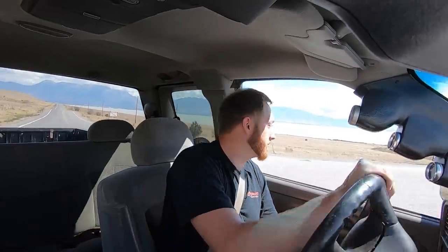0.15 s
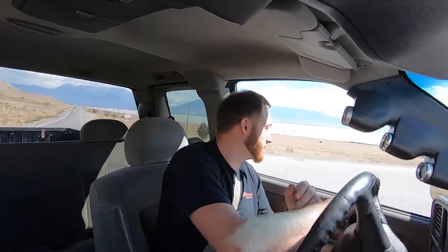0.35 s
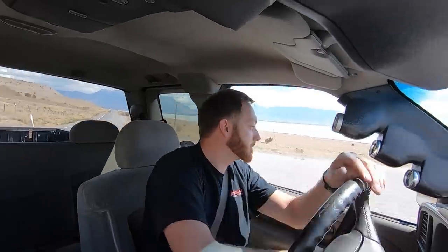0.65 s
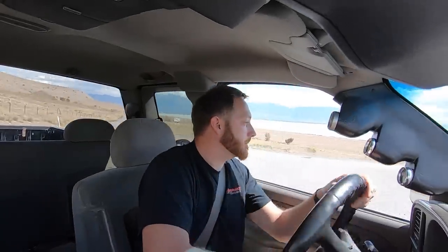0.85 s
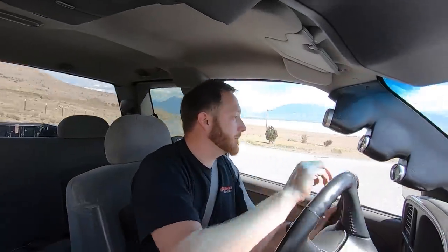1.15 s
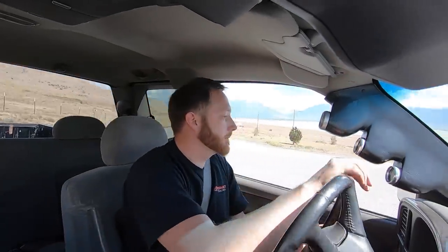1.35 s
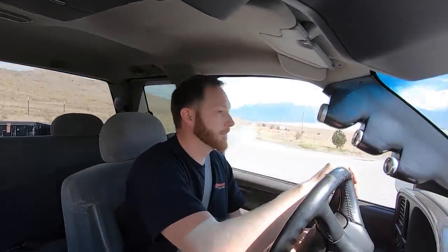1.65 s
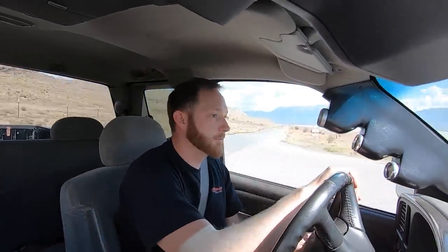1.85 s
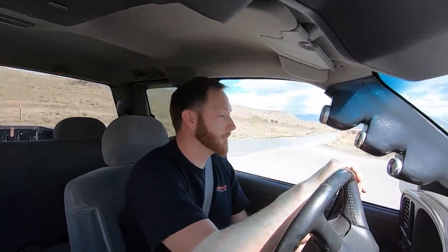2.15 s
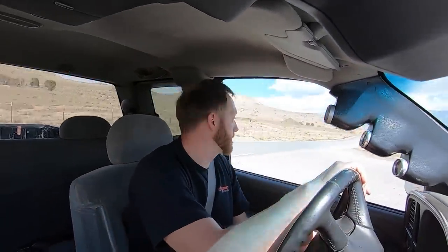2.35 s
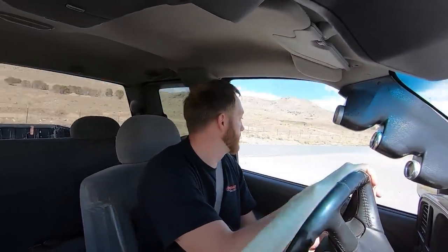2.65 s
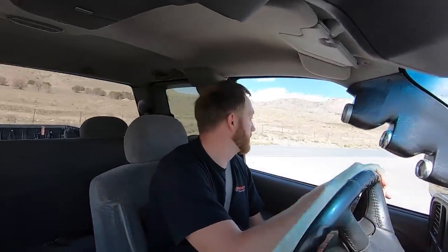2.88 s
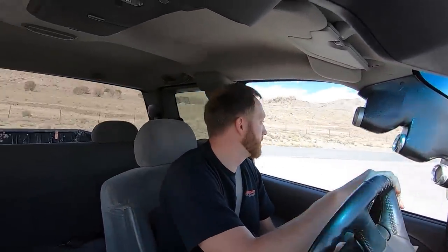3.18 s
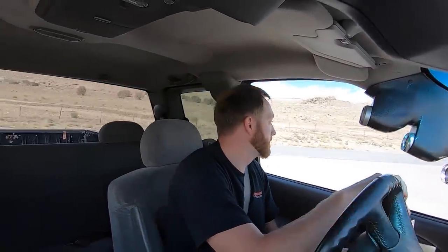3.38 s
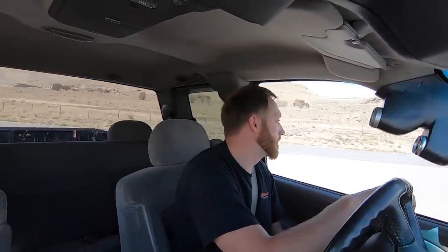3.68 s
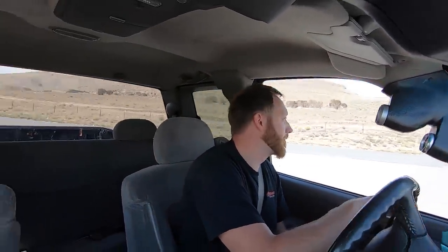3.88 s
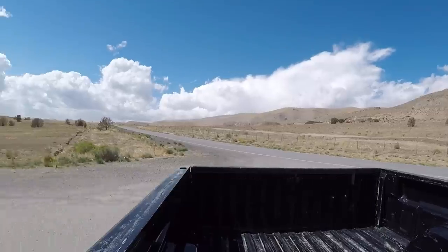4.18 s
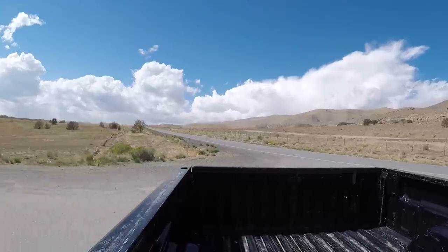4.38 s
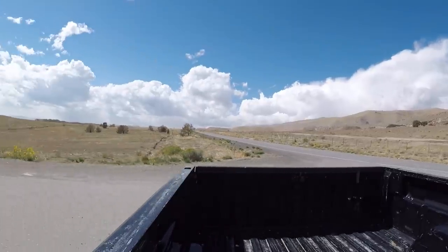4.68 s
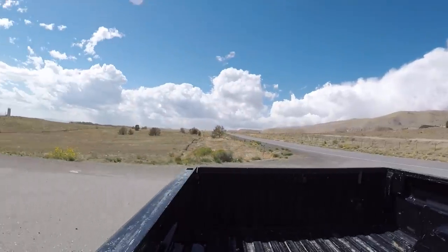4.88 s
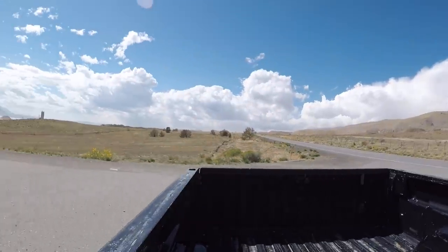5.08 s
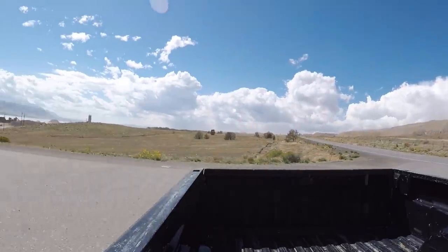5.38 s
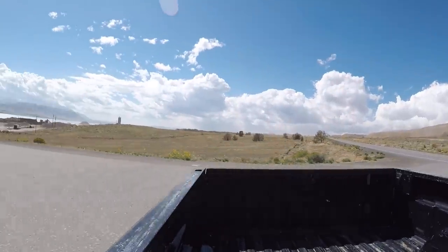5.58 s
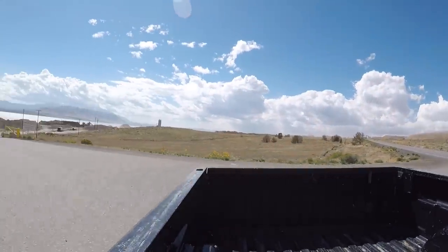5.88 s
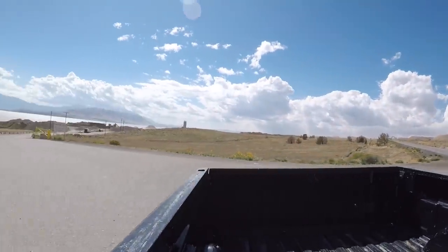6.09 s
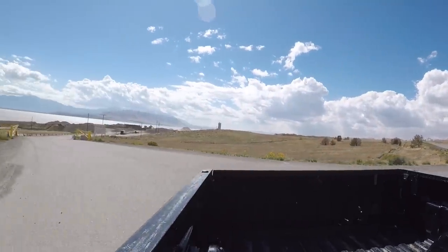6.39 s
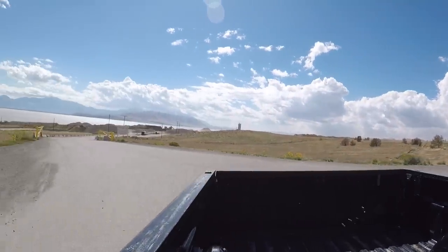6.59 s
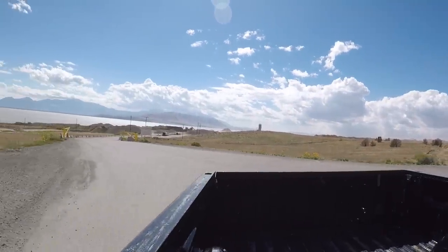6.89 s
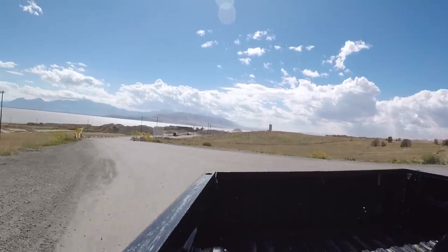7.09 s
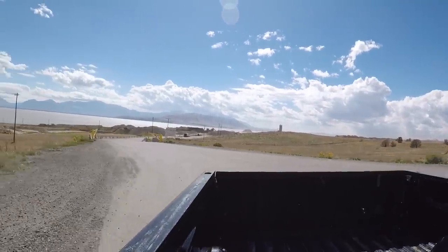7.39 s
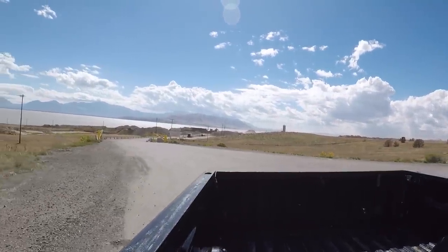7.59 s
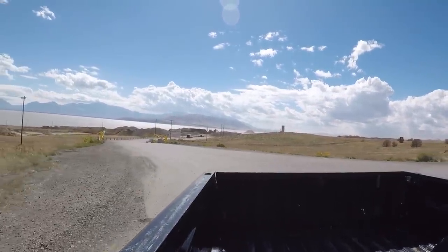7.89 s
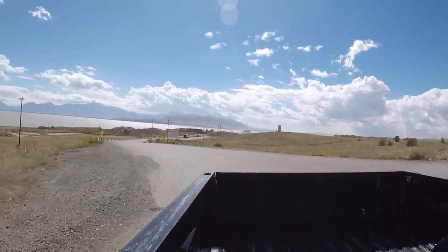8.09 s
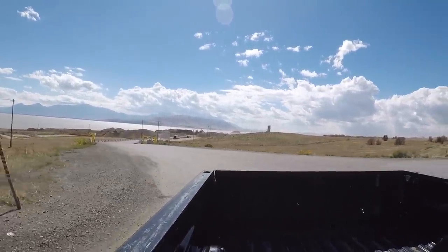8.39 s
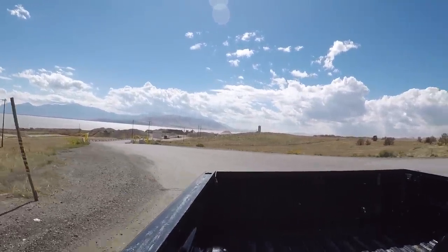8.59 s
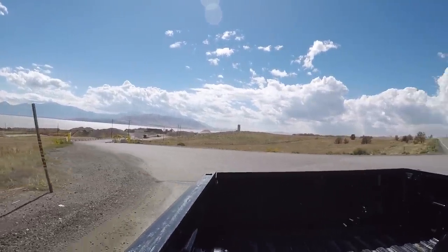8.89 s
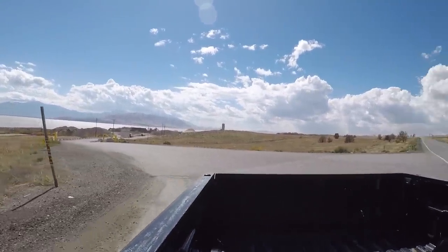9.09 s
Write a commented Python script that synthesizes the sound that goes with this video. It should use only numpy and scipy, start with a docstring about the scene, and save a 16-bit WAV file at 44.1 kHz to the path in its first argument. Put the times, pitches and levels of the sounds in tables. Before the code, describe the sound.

Inside a closed pickup cab, a low, muffled engine boom near idle and dull road rumble, with soft hand pats on the wheel and tiny trim ticks. Around 3.5 to 4 seconds it fades to a microphone in the open bed: much louder loping exhaust burble, engine clatter, tyre grit, wind and metallic bed rattles. A heavy thump and gust hit at six seconds, then the throttle opens and the engine climbs with a droning pipe.

```python
"""First we sit in the closed cab of a turbocharged V8 pickup that rolls through a turn near idle:
tones at multiples of the engine speed make a boom, filtered noise makes road and hands, trim ticks ring.
From about 3.5 s this fades over to the open load bed: noisy puffs ring the tailpipe in a loping burble,
the engine clatters, grit flicks, wind buffets, and bursts of noise shake the rattling bed; at 6 s it
thumps in a gust. At 7.5 s the throttle opens, the pipe drones and engine speed more than doubles."""
import sys
import numpy as np
from scipy import signal
from scipy.fft import rfft, irfft, next_fast_len
from scipy.io import wavfile
from scipy.ndimage import uniform_filter1d, minimum_filter1d

SR = 44100
rng = np.random.default_rng(int(sys.argv[2]) if len(sys.argv) > 2 else 0)


def to_wav(sig):
    """Store sig (one row per channel, or 1-D mono) as 16-bit WAV at the path in sys.argv[1].

    Samples outside -1..1 are clipped; the rate is SR.
    """
    pcm = np.clip(np.atleast_2d(sig), -1, 1) * 32767
    pcm = np.round(pcm).astype(np.int16)
    wavfile.write(sys.argv[1], SR, pcm.T)  # frames by channels


N = 407925
TIME = np.arange(N) / SR

# Noise colours, from low to high pitch; overall loudness is set elsewhere:
# (frequency [Hz], relative level [dB per Hz])
BUFFET_COLOUR = [(15, -18.5), (30, -3), (45, -0.5), (70, -5.5), (120, -8.5), (200, -11.5), (400, -54.5)]
GUST_COLOUR = [(25, 12), (70, 1.5), (300, -3), (600, -15.5), (1000, -34), (2000, -50)]
ROAD_COLOUR = [(25, 4), (60, 1), (125, -7), (170, -6), (280, -11.5), (370, -21), (550, -29.5), (1000, -35),
               (2000, -45.5), (4000, -52.5), (15000, -64)]
SWAY_COLOUR = [(12, 17), (23, 5), (33, 13.5), (52, -9), (200, -54)]
HISS_COLOUR = [(1500, 5), (3200, 5), (4500, 0.5), (6200, -3), (7300, -11.5), (8800, -7), (12000, -19.5),
               (15000, -29.5)]
GRIT_COLOUR = [(1500, -31), (3500, 10), (6000, 5), (7300, -3.5), (9000, -3), (11000, -6.5), (13500, -6.5),
               (15500, -30)]
HAND_COLOUR = [(200, 9), (500, 10.5), (1400, 4.5), (4000, -8.5), (8500, -3), (12000, -10), (15500, -26)]
CLATTER_COLOUR = [(150, -34), (300, 12), (600, 9), (900, 9), (1500, -4.5), (2200, -3.5), (3300, -28),
                  (7000, -75)]

# Loudness of the wind buffeting: (time [s], level [dB])
BUFFET_LEVEL = [(3.65, -36), (4.1, -25.5), (5.5, -23.5), (5.8, -22), (6.3, -25), (7.7, -24), (9.25, -26.5)]
# Gusts over the bed: (start [s], attack [s], hold [s], release [s], level before lumpiness [dB])
GUSTS = [(5.99, 0.032, 0.28, 0.5, -25)]
# Loudness of the tyre hiss, before the tread setting: (time [s], level [dB])
HISS_LEVEL = [(4.0, -48.5), (4.23, -49), (6.78, -55), (7.52, -50), (7.87, -47.5), (8.39, -53.5),
              (9.25, -52)]
# Grit flicked by the tyres, before the stone setting: (time [s], level [dB])
GRIT = [(3.7744, -42.5), (4.6155, -43.5), (4.8274, -43), (5.067, -43.5), (5.3911, -46.5), (5.684, -42),
        (5.8207, -45.5), (6.2906, -43), (6.8349, -49.5), (7.4305, -48), (8.1206, -44.5)]
# Ticks of the cab trim: (time [s], level [dB], ring [Hz])
TICKS = [(1.328, -62, 2000), (1.417, -55.5, 2500), (1.55, -59, 2200), (1.697, -62, 4300),
         (2.084, -61, 3080), (2.315, -59, 4860), (2.975, -58.5, 2290)]
# Hands on the wheel: (time [s], level [dB], time to die away by 60 dB [s], treble edge [Hz])
HAND_TOUCHES = [(.10, -57, 0.22, 5000), (.346, -49.5, 0.084, 9000), (0.4, -47, 0.039, 4000),
                (0.475, -40.5, 0.08, 14000), (0.505, -45, 0.084, 8000), (.77, -60, 0.21, 4000),
                (0.825, -44.5, 0.14, 5130), (.848, -57, .07, 4000), (.925, -62, 0.16, 5000),
                (1.425, -49, 0.17, 3000), (1.497, -47.5, 0.19, 4000)]
# The wheel slides through the hands: (start [s], attack [s], hold [s], release [s])
WHEEL_SLIDE = (0, .02, 0.7, 0.51)
# The bed thumps as the truck jolts over rough ground:
# (time [s], level [dB], time to die away by 60 dB [s])
THUMPS = [(6.074, -15, 0.066), (6.124, -10.5, 0.085), (6.196, -16, 0.27), (6.312, -20, 0.18),
          (6.411, -20, .1), (6.472, -19.5, 0.11)]
# Knocks in the bed, before the low and high settings:
# (time [s], level [dB], time to die away by 60 dB [s], extra level of the high ring [dB])
KNOCKS = [(3.591, -21, 0.14, -4.5), (4.078, -32, 0.063, 11.5), (4.236, -21.5, 0.23, 1.5),
          (4.339, -20.5, 0.15, -4), (4.519, -25, 0.055, -6), (4.552, -33, .12, 9), (4.71, -23, 0.062, -4),
          (4.781, -20.5, 0.23, -9), (5.068, -38.5, 0.23, 7.5), (6.126, -15, 0.093, -39),
          (6.135, -12, 0.029, -12.5), (6.197, -23, 0.28, -14), (6.245, -12, 0.048, -6.5),
          (6.754, -30.5, 0.56, -3), (6.978, -19, 0.09, -11), (7.225, -31, 0.13, 6.5),
          (8.026, -22, 0.08, -6), (8.063, -33, 0.065, 10), (8.935, -28.5, 0.31, 4), (9.044, -26.5, 0.4, -4),
          (9.107, -19, 0.23, -9), (9.185, -14.5, 0.25, -12)]

# Resonances, with levels relative to each other: (frequency [Hz], width [Hz], level [dB])
BED_THUD_MODES = [(128, 84, 3), (235, 56, 7.5), (377, 107, 2.5)]
STEEL_PANEL_MODES = [(527, 39, 2.5), (638, 65, 1), (862, 78, -1.5), (1115, 73, -5.5), (1207, 32, -2.5),
                     (1440, 100, -7), (1777, 73, -5), (1960, 240, -11.5), (2284, 250, -10),
                     (3160, 2000, -22), (5560, 2600, -21)]
TURBO_INLET_MODES = [(1454, 240, 8.5), (3250, 690, -2), (5850, 1500, -6.5)]
LOPE_MODES = [(252, 49, -1), (362, 52, 0)]
DRONE_MODE = [(246, 9.6, 0)]
TAILPIPE_MODES = [(177, 22.7, 0), (246, 27, 0), (269.3, 13.7, 1.5), (337, 18, -8.5), (378.6, 28, -5),
                  (537, 36, -7), (654, 30, -13), (829, 21, -16), (1277, 200, -25.5)]

# Presses on the pedal bring up the exhaust puffs:
# (start [s], attack [s], hold [s], release [s], lift [dB])
PEDAL_PRESSES = [(3.903, 0.57, 1.6, 0.59, 5.5), (6.753, 0.75, 0.85, 0.69, 5.5)]
# The eight cylinders in firing order: (strength [dB], delay along its own path [s])
CYLINDERS = [(2, 0.00021), (-0.5, 0.0014), (3, 0.00194), (2, .0019), (0, .0036), (0.5, 0.00082),
             (-4.5, 0.00303), (2, 0.0015)]
# Engine speed before its slight wavering: (time [s], four-stroke cycles per second [1/s])
ENGINE_SPEED = [(0.0, 6.86), (0.9, 7.53), (1.25, 6.83), (1.9, 7.33), (2.5, 7.08), (3.0, 7.2), (4.05, 6.8),
                (4.5, 7.14), (5.0, 6.99), (5.6, 7.24), (6.1, 6.95), (6.5, 7.2), (7.15, 7.76), (7.42, 7.79),
                (7.7, 10.9), (7.95, 12.85), (8.12, 13.55), (8.5, 13.65), (8.7, 14.35), (8.93, 15.8),
                (9.25, 16.05)]
# Engine tones, with relative levels: (multiple of the cycle rate [-], in the cab [dB],
# at the bed idling [dB], at the bed under load [dB])
ENGINE_ORDERS = [(5, -8, -6, 0), (7, -16, -9, -13), (8, -3, 1, -13), (9, -11, -13, -20),
                 (10, -18, -21, -18), (11, 1, -3, -18), (12, -13, -14, -19), (13, 1, 0, -16),
                 (15, -12, -8, -23), (16, 0, -7, -24), (17, -3, -9, -20), (18, -5, -15, -20),
                 (19, -4, -18, -28), (20, -18, -21, -18), (21, -8, -12, -21), (28, -26, -21, -27),
                 (40, -30, -26, -32)]
# Resonances and dips that lift or sink a passing tone: (frequency [Hz], half-width [Hz], lift [dB])
CAB_AIR_MODES = [(120, 4, 7)]
BOOM_PIPE_MODES = [(88.5, 4.5, 10), (101, 6, -8), (123, 6, 8), (138, 4, -9), (156, 7, 5), (207, 12, -6),
                   (268, 12, 6), (315, 25, -8), (540, 16, 13), (630, 30, -10)]

BUFFET_SWING_DB = 2
CAB_ROAD_DB, CAB_SWAY_DB, CAB_BOOM_DB = -35, -31, -29.5
TICK_DECAY_S, TICK_WIDTH_HZ = 0.088, 570
CLATTER_DB, CLATTER_FOLLOWS = -32, 0.63  # the second is a share of the swing of the tyre hiss
# Place of the chug in the cycle (0-1), level, unevenness, and cycles per second at which it is gone
LOPE_AT, LOPE_DB, LOPE_UNEVEN_DB, LOPE_GONE_AT = .54, -36.5, 1.5, 8.5
# Pipe drone: start, attack, hold and release in seconds, and its level
DRONE_SWELL, DRONE_DB = (7.39, 0.16, 0.36, 0.17), -23.5
# Hotter gas raises the drone by this share of its pitch
HEAT_AT_S, HEAT_S, HEAT_RISE = 7.68, .4, 0.101
# Exhaust puffs: level at idle, and what full strain adds
BARK_DB, BARK_STRAIN_DB = -33, 4.5
PIPE_LOW_EDGE_HZ = 179
# Exhaust boom at the bed: level at idle, then what load (as load squared) and strain add when at 1
BOOM_DB, BOOM_LOAD_DB, BOOM_STRAIN_DB = -17.6, 4.2, 1
THROTTLE_AT_S, THROTTLE_OPENS_S, FULL_LOAD = 7.52, 0.21, 0.97  # load runs 0-1
STRAIN_LAG_S = 0.1
FADE_AT_S, FADE_S = 3.456, 0.66  # from the cab to the bed
CUTOFF_HZ = 15700


def from_db(db):
    """Turn decibels into a gain."""
    return 10 ** (np.asarray(db) / 20)


def rms_one(x):
    """Scale a sound to an average (rms) strength of 1."""
    return x / np.sqrt(np.mean(x ** 2) + 1e-20)


def even(x, size=14700):
    """Hold the running rms, taken over size samples, near 1."""
    return x / np.sqrt(np.abs(uniform_filter1d(x ** 2, size=size)) + 1e-20)


def in_time(rows):
    """Draw each column of a curve at every sample."""
    s, *columns = np.transpose(rows)
    return [np.interp(TIME, s, c) for c in columns]


def drift(rate):
    """Wander by chance around 0 with a spread of 1; a higher rate (in Hz) wanders faster."""
    # made at one fortieth of the sample rate; the first 2000 values let the filter settle
    r = np.exp(-80 * np.pi * rate / SR)
    chance = rng.standard_normal(N // 40 + 2002)
    slow = signal.lfilter([1], [1, -2 * r, r * r], chance)[2000:]
    return np.interp(np.arange(N) / 40, np.arange(len(slow)), rms_one(slow))


def noise(colour):
    """Noise of rms 1 shaped by a colour table, falling away beyond its ends."""
    hz, db = np.transpose(colour)
    size = next_fast_len(N)
    f = np.maximum(np.arange(size // 2 + 1) * SR / size, 1)
    gain = from_db(np.interp(np.log(f), np.log(hz), db))
    gain *= np.minimum(f / hz[0], 1) ** 2 * np.minimum(hz[-1] / f, 1) ** 2
    return rms_one(irfft(rfft(rng.standard_normal(size)) * gain, size)[:N])


def resonate(x, modes):
    """Ring several resonances side by side, with alternating sign."""
    out = 0
    for k, (hz, width, db) in enumerate(modes):
        r = np.exp(-np.pi * width / SR)  # a narrow width rings longer
        poles = [1, -2 * r * np.cos(2 * np.pi * hz / SR), r * r]
        ring = signal.lfilter([1, 0, -1], poles, x + 1e-18)  # tiny offset avoids slow arithmetic
        out = out + (-1) ** k * from_db(db) * (1 - r * r) / 2 * ring
    return out


def muffle(x, edge_hz):
    """Take away the treble above an edge with a second-order low-pass."""
    return signal.sosfilt(signal.butter(2, edge_hz, fs=SR, output="sos"), x)


def ramp(start, length):
    """Rise from 0 to 1."""
    return np.clip((TIME - start) / length, 0, 1)


def swell(start, attack, hold, release):
    """Rise to 1, hold and fall back to 0."""
    return ramp(start, attack) - ramp(start + attack + hold, release)


def burst(at, rise, t60):
    """Swell up to a moment, then die away by 60 dB in t60 seconds."""
    out = np.zeros(N)
    near = np.abs(TIME - at) < .5
    after = TIME[near] - at
    out[near] = np.exp(np.minimum(after, 0) / rise) * from_db(-60 * np.maximum(after, 0) / t60)
    return out


def lift_db(pitch, modes):
    """How much a set of resonances and dips lifts a tone at a given pitch."""
    return sum(db / (1 + ((pitch - hz) / width) ** 2) for hz, width, db in modes)


def wind(lump_db):
    """Low buffeting on the microphone, and gusts whose level is lumpy."""
    buffet_db, = in_time(BUFFET_LEVEL)
    buffet = from_db(buffet_db + BUFFET_SWING_DB * drift(2.1)) * noise(BUFFET_COLOUR)
    gusts = sum(from_db(db) * swell(*shape) for *shape, db in GUSTS)
    return buffet + gusts * from_db(lump_db * drift(33)) * noise(GUST_COLOUR)


def road_and_sway():
    """Dull road noise that flutters in level, and the low sway of the body, as heard in the cab."""
    road = from_db(CAB_ROAD_DB + drift(23)) * noise(ROAD_COLOUR)
    return road + from_db(CAB_SWAY_DB) * noise(SWAY_COLOUR)


def tyres(hiss_db, tread_db, flutter_db, stone_db, skitter_s):
    """Uneven tread hiss, and stones spat out that skitter briefly."""
    hiss = from_db(hiss_db + tread_db + flutter_db * drift(16.0)) * noise(HISS_COLOUR)
    stones = sum(from_db(db) * burst(s + .001, .001, skitter_s) for s, db in GRIT)
    return hiss + from_db(stone_db) * stones * noise(GRIT_COLOUR)


def trim():
    """Short ticks of the cab trim, each ringing at its own pitch."""
    contact = rng.standard_normal(N)
    out = 0
    for s, db, hz in TICKS:
        ring = rms_one(resonate(contact, [(hz, TICK_WIDTH_HZ, 0)]))
        out = out + from_db(db) * burst(s, .001, TICK_DECAY_S) * ring
    return out


def hands(grain_db, slide_db):
    """Grainy rubbing: the wheel slides through the hands as it turns, with sharp pats and slower brushes."""
    rub = rms_one(noise(HAND_COLOUR) * from_db(grain_db * drift(150)))
    out = from_db(slide_db + 2 * drift(10)) * swell(*WHEEL_SLIDE) * rub
    for s, db, t60, edge_hz in HAND_TOUCHES:
        # touches that die away sooner also start more sharply
        out = out + from_db(db) * burst(s, t60 ** 3, t60) * muffle(rub, edge_hz)
    return out


def bed_thumps(edge_hz):
    """Soft, heavy blows that shake the lowest modes of the bed into a dull thud."""
    shake = even(muffle(resonate(rng.standard_normal(N), BED_THUD_MODES), edge_hz), size=882)
    return shake * sum(from_db(db) * burst(s + .003, .003, t60) for s, db, t60 in THUMPS)


def bed_rattle(grain_db, split_hz, low_db, high_db):
    """Each knock is a quick flurry of contacts on steel panels; sharp ones stir the high modes more."""
    contacts = muffle(rng.standard_normal(N) * from_db(grain_db * drift(260)), edge_hz=2960)
    body = sum(from_db(db) * burst(s, .002, t60) for s, db, t60, _ in KNOCKS)
    clank = sum(from_db(db + sharp_db) * burst(s, .0015, t60) for s, db, t60, sharp_db in KNOCKS)
    low_modes = [mode for mode in STEEL_PANEL_MODES if mode[0] < split_hz]
    high_modes = [mode for mode in STEEL_PANEL_MODES if mode[0] >= split_hz]
    low = even(muffle(resonate(contacts, low_modes), edge_hz=2000), size=882)
    high = even(resonate(contacts, high_modes), size=882)
    return from_db(low_db) * body * low + from_db(high_db) * clank * high


def intake(load, speed, level_db, steepness):
    """Air rushing into the turbo, a hollow hiss that builds with load and engine speed."""
    rush = rms_one(resonate(noise(HISS_COLOUR), TURBO_INLET_MODES))
    return from_db(level_db) * load ** 2 * (speed / speed.max()) ** steepness * rush


def firings(turn, uneven_db, jitter_s, t60):
    """Eight dying puffs a cycle, each late by its own path and a little different in strength and timing."""
    at = np.flatnonzero(np.diff(np.floor(8 * turn)))
    db, path_s = np.resize(CYLINDERS, (len(at), 2)).T
    chance = rng.standard_normal((len(at), 2))
    late = ((path_s + chance[:, 0] * jitter_s) * SR).astype(int)
    clicks = np.zeros(N)
    clicks[np.clip(at + late, 0, N - 1)] = from_db(db + uneven_db * chance[:, 1])
    fade = np.exp(-np.log(1000) / (t60 * SR))  # down 60 dB after t60
    return even(signal.lfilter([1], [1, -fade], clicks + 1e-18))


def clatter(turn, depth, flutter_db):
    """Mechanical noise of the engine, beating with the firings."""
    beat = firings(turn, uneven_db=3.0, jitter_s=.0004, t60=.045)
    return even(noise(CLATTER_COLOUR) * (1 + depth * beat) * from_db(flutter_db * drift(5.7)))


def lope(turn, speed):
    """Once a cycle two firings crowd together, here one click rung to a hollow chug that fades above idle."""
    at = np.flatnonzero(np.diff(np.floor(turn - LOPE_AT)))
    idling = np.clip((LOPE_GONE_AT - speed[at]) / (LOPE_GONE_AT - speed.min()), 0, 1)
    clicks = np.zeros(N)
    clicks[at] = idling * from_db(LOPE_UNEVEN_DB * rng.standard_normal(len(at)))
    return from_db(LOPE_DB) * rms_one(resonate(resonate(clicks, LOPE_MODES), LOPE_MODES))


def drone(edges):
    """One pipe mode sings out as the rising orders sweep across it, and climbs as the gas heats."""
    # stretch time, ring the mode, then squeeze time back: only the pitch of the ring rises
    clock = np.cumsum(1 + HEAT_RISE * ramp(HEAT_AT_S, HEAT_S))
    steps = np.arange(int(clock[-1]))
    stretched = np.interp(steps, clock, edges)
    ringing = resonate(resonate(stretched, DRONE_MODE), DRONE_MODE)
    return from_db(DRONE_DB) * swell(*DRONE_SWELL) * even(np.interp(clock, steps, ringing), size=4410)


def exhaust(turn, load, strain):
    """Each puff and its turbulence ring the tailpipe; load slightly lowers the share of turbulence."""
    puffs = firings(turn, uneven_db=1.5, jitter_s=.00018, t60=.012)
    edges = even(np.diff(puffs, prepend=0))
    turbulence = even((.5 + puffs) * rng.standard_normal(N))
    flow = edges + (.5 - .1 * load) * turbulence
    flow = signal.sosfilt(signal.butter(4, PIPE_LOW_EDGE_HZ, "high", fs=SR, output="sos"), flow)
    burble = even(muffle(resonate(flow, TAILPIPE_MODES), edge_hz=1440), size=6615)
    presses_db = sum(db * swell(*shape) for *shape, db in PEDAL_PRESSES)
    return from_db(BARK_DB + BARK_STRAIN_DB * strain + presses_db) * burble + drone(edges)


def strain_of(speed):
    """How hard the engine is gaining speed, 0-1, a moment behind the gain itself."""
    gain_in_speed = np.maximum(np.gradient(speed), 0)
    gaining = signal.lfilter([1], [1, -np.exp(-1 / (STRAIN_LAG_S * SR))], gain_in_speed)
    return gaining / gaining.max()


def boom(turn, load, waver_db, wander):
    """Engine tones in the cab and at the bed; each swells or sinks as it crosses a resonance or a dip."""
    speed = np.gradient(turn) * SR
    inside, outside = 0, 0
    for order, cab_db, idle_db, load_db in ENGINE_ORDERS:
        # uneven combustion makes each order wander; under load the low ones steady, the high ones roughen
        slow_slip = (1 - load) * drift(3.1)
        rough_slip = load * order / 12 * drift(12)
        slip = rng.random() + wander * (slow_slip + rough_slip)
        tone = np.sin(2 * np.pi * (order * turn + slip)) * from_db(waver_db * drift(3.2))
        inside = inside + from_db(cab_db + lift_db(order * speed, CAB_AIR_MODES)) * tone
        bed_gain = (1 - load) * from_db(idle_db) + load * from_db(load_db)
        outside = outside + bed_gain * from_db(lift_db(order * speed, BOOM_PIPE_MODES)) * tone
    return even(inside, size=8820), even(outside, size=6615)


def scene():
    """One engine, heard from the cab and then from the bed."""
    speed, = in_time(ENGINE_SPEED)
    hiss_db, = in_time(HISS_LEVEL)
    turn = np.cumsum(speed * (1 + .002 * drift(5))) / SR  # engine cycles so far
    load = FULL_LOAD * ramp(THROTTLE_AT_S, THROTTLE_OPENS_S)
    strain = strain_of(speed)
    cab_boom, bed_boom = boom(turn, load ** 2, waver_db=1.5, wander=0.04)

    # the boom comes through the firewall
    cab = road_and_sway() + trim() + hands(grain_db=2.5, slide_db=-64.5)
    cab += from_db(CAB_BOOM_DB) * cab_boom

    bed = wind(lump_db=7.0)
    bed += tyres(hiss_db, tread_db=2.0, flutter_db=2.0, stone_db=-0.5, skitter_s=0.23)
    bed += bed_thumps(edge_hz=930)
    bed += bed_rattle(grain_db=4.5, split_hz=1180, low_db=-5.0, high_db=-4.5)
    bed += intake(load, speed, level_db=-41.5, steepness=2.2)
    clatter_db = CLATTER_DB + CLATTER_FOLLOWS * (hiss_db - hiss_db.mean())
    bed += from_db(clatter_db) * clatter(turn, depth=0.079, flutter_db=1.5)
    bed += lope(turn, speed) + exhaust(turn, load, strain)
    bed += from_db(BOOM_DB + BOOM_LOAD_DB * load ** 2 + BOOM_STRAIN_DB * strain) * bed_boom

    outside = ramp(FADE_AT_S, FADE_S)
    return (np.sqrt(1 - outside ** 2) * cab + outside * bed)[None]


def record(dry):
    """A fast limiter holds the peaks down, the start fades in quickly and the top is cut."""
    needed = .61 / np.maximum(np.abs(dry), .61)
    gain = uniform_filter1d(minimum_filter1d(needed, size=441), size=441)
    top_cut = signal.cheby2(14, 60, CUTOFF_HZ + 600, fs=SR, output="sos")
    return signal.sosfilt(top_cut, dry * gain * ramp(0, .004))


dry = scene()
out = record(dry)
to_wav(out)
```